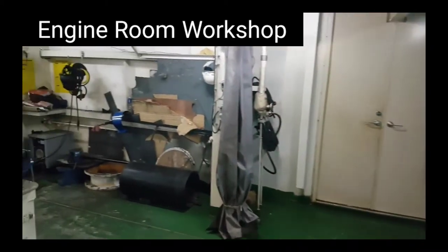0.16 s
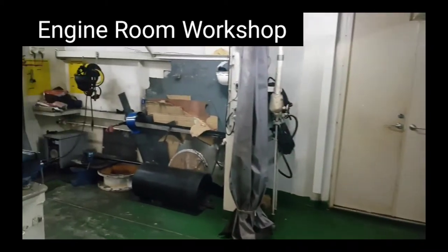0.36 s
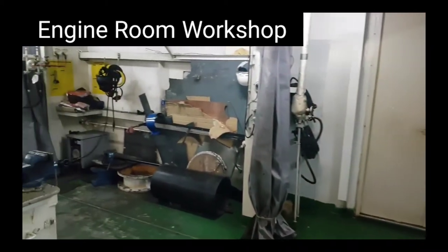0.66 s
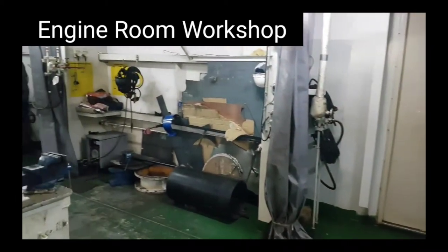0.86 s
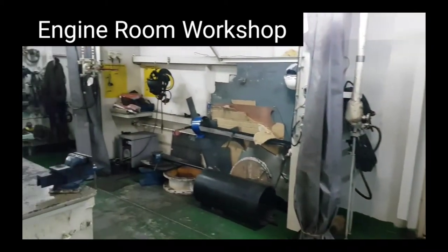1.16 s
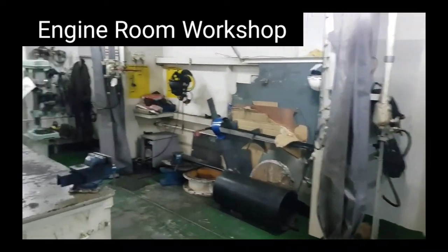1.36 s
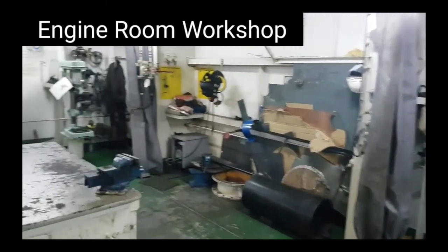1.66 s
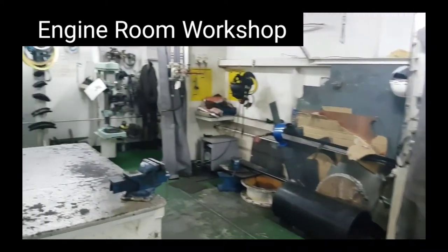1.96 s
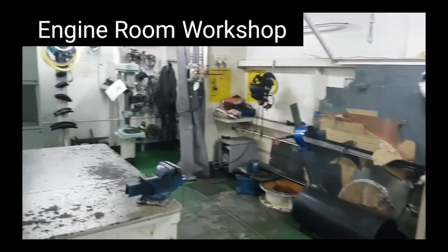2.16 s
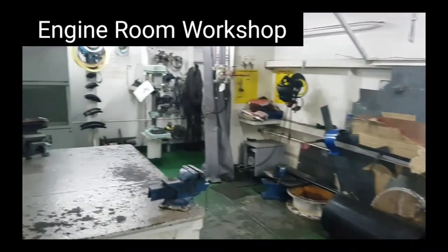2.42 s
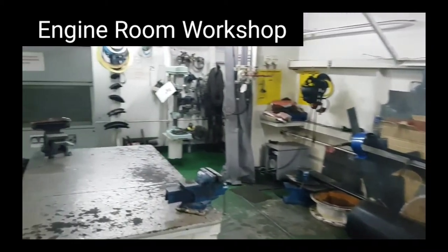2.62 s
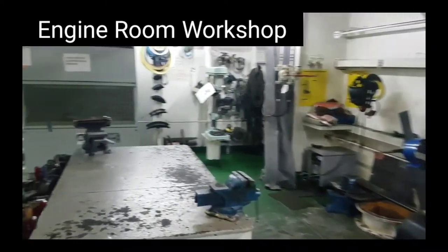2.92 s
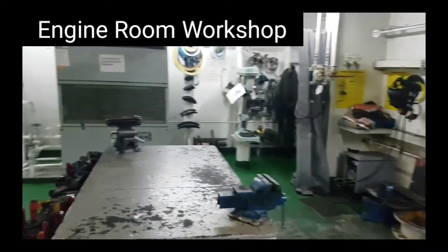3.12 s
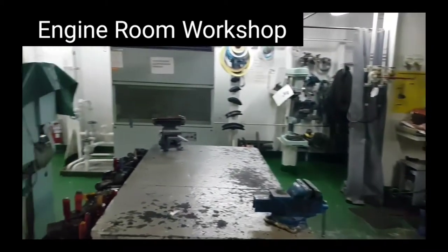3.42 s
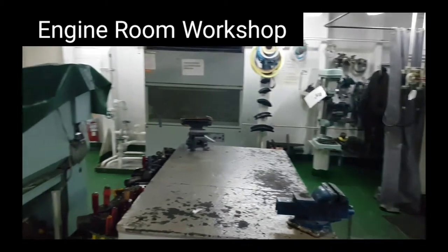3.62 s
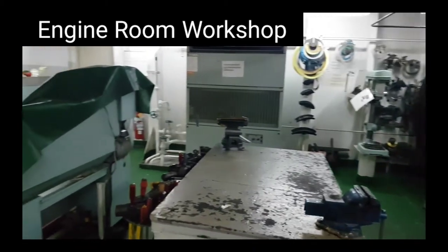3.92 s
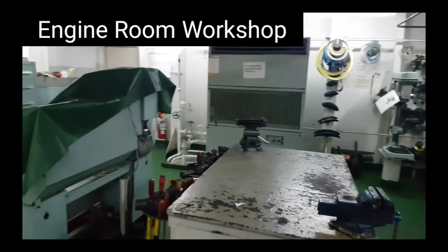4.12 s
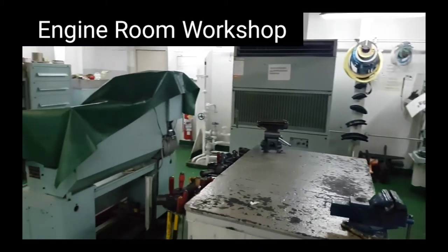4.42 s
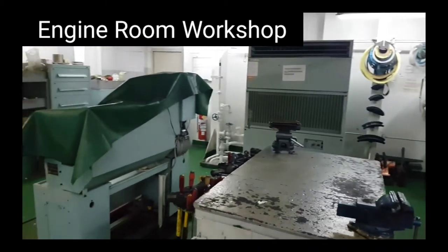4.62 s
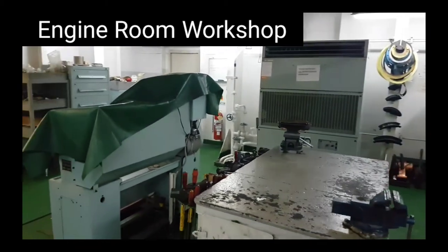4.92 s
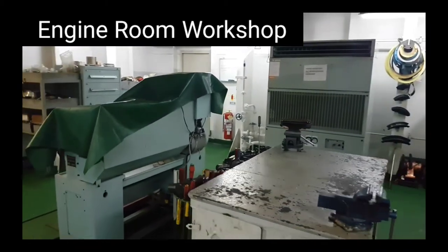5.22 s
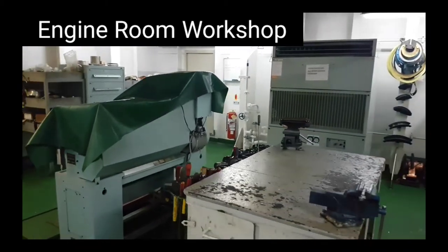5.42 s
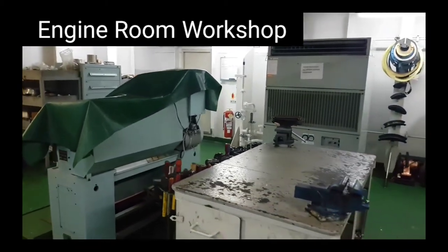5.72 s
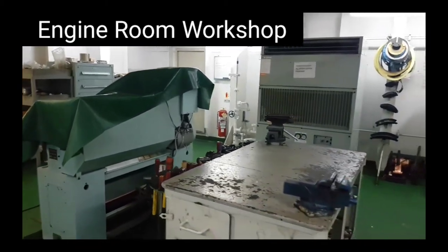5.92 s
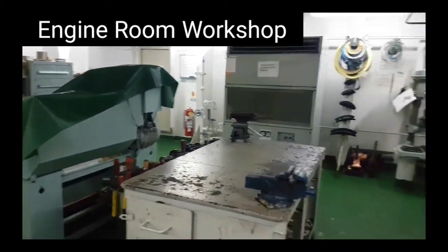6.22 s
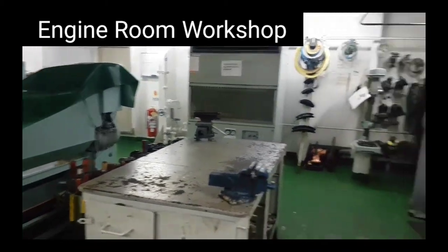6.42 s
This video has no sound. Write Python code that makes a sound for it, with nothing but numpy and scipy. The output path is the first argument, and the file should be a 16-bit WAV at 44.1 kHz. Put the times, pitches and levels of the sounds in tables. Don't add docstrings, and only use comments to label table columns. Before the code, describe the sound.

Constant dense machinery hum in a ringing metal room aboard ship, tones swelling and fading, with a dry microphone rub near the middle.

```python
import sys
import numpy as np
from scipy import signal
from scipy.fft import rfft, irfft, next_fast_len
from scipy.io import wavfile
from scipy.ndimage import map_coordinates

SR = 44100
rng = np.random.default_rng(int(sys.argv[2]) if len(sys.argv) > 2 else 0)


def convert_level_to_amplitude(level_db):
    exponent = np.asarray(level_db, float) / 20
    return 10 ** exponent


def digitize_waveform(pressure):
    field = np.atleast_2d(pressure).T
    bounded = np.clip(field, -1, 1)
    quanta = np.round(bounded * 32767).astype(np.int16)
    wavfile.write(sys.argv[1], SR, quanta)


N = 289692
TIME = np.arange(N) / SR
PADDED = next_fast_len(N, True)
HZ = np.fft.rfftfreq(PADDED, 1 / SR) + 1

# [gain below the corner frequency, dB]
BASS = [(0, 0.5), (1.5, 3), (3.0, 0), (4.5, 0.5), (6.57, 1)]
BASS_HZ = 125
# pitch_hz [Hz], side minus mid [dB]
WIDTH = [(60, -22), (91, -20), (140, -18), (210, -16.5), (320, -10), (490, -6), (740, -3), (1120, 1),
         (1700, 3), (2590, -1), (3930, 0), (5980, -8), (9080, -3), (13800, -2)]


def at_hz(points, hz):
    points = np.array(points)
    return np.interp(np.log(hz), np.log(points[:, 0]), points[:, 1])


def in_time(rows, s=TIME):
    return np.interp(s, *np.transpose(rows))


def coloured(x, db):
    return irfft(rfft(x, PADDED) * convert_level_to_amplitude(db), PADDED)[:, :N]


def left_right(mid, side):
    return np.array([mid + side, mid - side])


def wander(keep, count):
    gains = rng.standard_normal((count, 2, len(keep), 2)) @ [1, 1j] / np.sqrt(2)
    for i in range(1, count):
        gains[i] = keep * gains[i - 1] + np.sqrt(1 - keep ** 2) * gains[i]
    return gains.transpose(1, 0, 2)


def standing_db(hz):
    # pitch_hz [Hz], width_hz [Hz], level_db [dB]
    room = [(68, 29, -6.5), (86, 6.9, 5), (138, 25, 0.5), (172.5, 9.2, 5), (230, 18, 0.5), (310, 10, 4.5),
            (343.6, 8.2, -14), (405, 10.6, -6.5), (413.5, 12.4, 5), (451, 10, -1.5), (522, 16, -2),
            (668, 24, -1.5), (740, 5.7, 4.5), (761, 9.6, -2.5), (819, 4.6, -3)]
    return sum(db * np.exp(-((hz - mode_hz) / width_hz) ** 2) for mode_hz, width_hz, db in room)


def engine(lift_db):
    # order [multiple of the cycle], crest_db [dB on its standing-wave crest],
    # crest_s [s when the head passes it]
    strong = [(15, -29.4, 10.9), (17, -27.3, 0.6), (18, -29.9, 10.4), (21, -27.1, 1.5), (28, -24.6, 8.4),
              (29, -26.5, 7.5), (32, -31.3, 2.7), (33, -31.8, 3.4), (39, -26.1, 1.2), (40, -25.6, 3.9),
              (43, -28.3, 5.7), (44, -30.8, 2.2), (53, -33.4, 3.3), (54, -33.2, 0.0), (56, -29.5, 2.2),
              (59, -32.6, 4.6), (63, -33.3, 5.1), (70, -32.2, 2.7), (80, -35.4, 5.6), (89, -32.6, 2.1),
              (102, -36.6, 4.6), (123, -32.0, 3.4), (124, -35.0, 4.5), (125, -36.2, 0.9), (127, -36.6, 1.1),
              (128, -34.8, 2.1), (131, -36.8, 1.8), (132, -38.4, 4.7), (135, -40.2, 1.4), (142, -40.0, 1.9)]
    # pitch_hz [Hz], level_db [dB each]
    comb = [(38, -44), (59, -29.5), (93, -35), (157, -40.5), (260, -39.5), (399, -41.5), (546, -38),
            (655, -46), (713, -44.5), (786, -38.5), (878, -47.5), (981, -49), (1153, -52.5), (1378, -63)]
    cycle_hz, wander_turns = 6.0165, 211
    strong_hold = .08
    crest_gap_s, gap_shrink = 11, .4
    trough = .3

    turns = cycle_hz * TIME
    count, size = int(turns[-1]) + 2, 2 ** 14
    orders = np.arange(6, 251)
    start_s, hz = np.interp(np.arange(count), turns, TIME), orders * cycle_hz

    hold = np.where(np.isin(orders, np.array(strong)[:, 0]), strong_hold, 1)
    gains = wander(np.exp(-hold * (orders / wander_turns) ** 2), count=count)
    level_db = at_hz(comb, hz) + standing_db(hz)
    level_db = level_db + np.outer(in_time(BASS, start_s), hz < BASS_HZ)

    for order, crest_db, crest_s in strong:
        column = int(order) - orders[0]
        gap_s = crest_gap_s * (100 / (order * cycle_hz)) ** gap_shrink
        wave = np.cos(np.pi * (start_s - crest_s) / gap_s) ** 2
        share = trough ** 2 + (1 - trough ** 2) * wave
        level_db[:, column] = crest_db + 10 * np.log10(share) + lift_db
        gains[0, :, column] /= np.abs(gains[0, :, column])

    spectra = np.zeros((2, count, size // 2 + 1), complex)
    spectra[:, :, orders] = gains * convert_level_to_amplitude(level_db) * size / np.sqrt(2)
    spectra[1][:, orders] *= convert_level_to_amplitude(at_hz(WIDTH, hz))
    waves = irfft(spectra, size)
    waves = np.concatenate([waves, waves[:, :, :1]], axis=2)
    crank = turns % 1 * size
    mid, side = [map_coordinates(wave, [turns, crank], order=1) for wave in waves]
    return left_right(mid, side)


def swell(crests, width_s, trough_db, s):
    bells = sum(convert_level_to_amplitude(db) * np.exp(-((s - at) / width_s) ** 2) for at, db in crests)
    return np.sqrt(2) * (convert_level_to_amplitude(trough_db) + bells)


def tones(hold_s, boost_db):
    # pitch_hz [Hz], level_db [dB]
    steady = [(354.6, -42), (709.2, -49), (920.5, -42), (1065.2, -47), (1106.3, -35), (1209.2, -45),
              (1290, -41), (1390.2, -52), (1417.8, -43), (1475, -47), (1659.4, -48), (1773.1, -47),
              (2028.8, -51), (2211.2, -57), (2929.5, -47), (3547.5, -54)]
    # crest_s [s at the peak of the crest], level_db [dB]
    pump_crests = [(.08, -31.5), (.45, -38), (.95, -40), (1.36, -36.5), (1.89, -33.5), (2.42, -38),
                   (2.91, -36.5), (3.5, -44), (4.05, -41), (4.45, -42), (4.87, -39), (5.5, -43),
                   (6.36, -39)]
    # crest_s [s at the peak of the crest], level_db [dB]
    blade_crests = [(.07, -45), (.43, -46), (.82, -45.5), (1.14, -44.5), (1.6, -43), (1.95, -48),
                    (2.25, -43.5), (2.55, -48), (2.9, -44.5), (3.1, -49), (3.33, -46), (4.0, -48),
                    (4.4, -48), (4.8, -43), (5.1, -43.5), (5.41, -45.5), (5.65, -44), (6.18, -49)]

    hz, level_db = np.transpose(steady)
    height = convert_level_to_amplitude(level_db + boost_db)
    steps = np.arange(0, N + 1024, 1024) / SR
    gains = wander(np.exp(-(steps[1] * hz / 1000 / hold_s) ** 1.26), count=len(steps))
    gains /= np.sqrt(np.mean(np.abs(gains) ** 2, axis=1, keepdims=True))

    pump, blades = 4, 14
    pump_swell = swell(pump_crests, width_s=0.17, trough_db=-48, s=steps)
    blade_swell = swell(blade_crests, width_s=0.11, trough_db=-65.5, s=steps)
    for k, swelling in (pump, pump_swell), (blades, blade_swell):
        gains[0, :, k] *= swelling / height[k] / np.abs(gains[0, :, k])

    out = np.zeros((2, N))
    for k in range(len(hz)):
        spin = np.exp(2j * np.pi * hz[k] * TIME)
        mid, side = [(np.interp(TIME, steps, g[:, k]) * spin).real for g in gains]
        out += height[k] * left_right(mid, convert_level_to_amplitude(at_hz(WIDTH, hz[k])) * side)
    return out


def air():
    # pitch_hz [Hz], level_db [dB per Hz]
    hiss = [(22, -67), (40, -45), (100, -47), (250, -50), (550, -50.5), (800, -56), (1100, -61),
            (1700, -67), (3100, -72), (3500, -77), (5100, -85.5), (7300, -88.5), (9300, -104.5),
            (14000, -101)]
    # [side share, dB]
    whine = [(5835, 340, -46.3, -9), (8790, 220, -72, -3), (11720, 260, -72, -4), (3545, 40, -57.5, 0.1)]

    mid_power = convert_level_to_amplitude(at_hz(hiss, HZ) + standing_db(HZ)) ** 2
    side_power = mid_power * convert_level_to_amplitude(at_hz(WIDTH, HZ)) ** 2
    for hz, width_hz, db, side_db in whine:
        hump = convert_level_to_amplitude(db) ** 2 / width_hz / (1 + (2 * (HZ - hz) / width_hz) ** 2) ** 2
        mid_power = mid_power + hump
        side_power = side_power + hump * convert_level_to_amplitude(side_db) ** 2

    white = rfft(rng.standard_normal((2, PADDED)))
    noise = irfft(white * np.sqrt(np.array([mid_power, side_power]) * SR / 2), PADDED)[:, :N]
    bass = signal.sosfilt(signal.butter(2, BASS_HZ, fs=SR, output="sos"), noise)
    mid, side = noise + (convert_level_to_amplitude(in_time(BASS)) - 1) * bass
    return left_right(mid, side)


def slide(slips_per_s, side_db, trim_db):
    # pitch_hz [Hz], level_db [dB per Hz]
    skin_colour = [(3000, -14), (5000, 3), (7000, 6), (8600, -6), (11200, -3.5), (14300, -1), (16000, -30)]
    # start_s [s at full pressure], level_db [dB], hold_s [s]
    strokes = [
        (2.93, -47.5, .005),
        (3.065, -47, .05),
        (6.4, -64, .04),
        (6.47, -60, .025),
        (6.55, -75, .01),
    ]
    press_db_per_s, ease_db_per_s = 330, 150
    dull_db_per_s, dull_hz = 150, 12300

    ticks = (rng.random((2, N)) < slips_per_s / SR) * rng.standard_normal((2, N))
    skin = coloured(ticks, at_hz(skin_colour, HZ))
    top = coloured(skin, -60 * (HZ < dull_hz))
    body = bright = 0
    for s, db, hold_s in strokes:
        early, late = np.maximum(s - TIME, 0), np.maximum(TIME - s - hold_s, 0)
        press_db = db - press_db_per_s * early - ease_db_per_s * late
        body = body + convert_level_to_amplitude(press_db)
        bright = bright + convert_level_to_amplitude(press_db - dull_db_per_s * late)
    mid, side = (body * (skin - top) + bright * top) / skin[0].std()
    return convert_level_to_amplitude(trim_db) * left_right(mid, convert_level_to_amplitude(side_db) * side)


def scene():
    drone = engine(lift_db=1.2)
    machinery = drone + tones(hold_s=0.35, boost_db=0.5) + air()
    return machinery + slide(slips_per_s=7000, side_db=-5, trim_db=2.5)


def low_pass(x):
    return signal.sosfilt(signal.butter(12, 14500, fs=SR, output="sos"), x)


def record(dry):
    # pitch_hz [Hz], left minus right [dB]
    lean = [(60, -0.4), (2000, -0.15), (4000, -2.5), (6000, -6), (7300, -4.5), (8400, 13), (10000, 22.5),
            (11700, 13), (14000, 3.5)]
    mic_cut_hz = 24
    bass_loss_db = 20 * np.log10(1 + (mic_cut_hz / HZ) ** 4)
    ports = coloured(dry, np.outer([.5, -.5], at_hz(lean, HZ)) - bass_loss_db)
    return low_pass(ports)


dry = scene()
out = record(dry)
digitize_waveform(out)
```